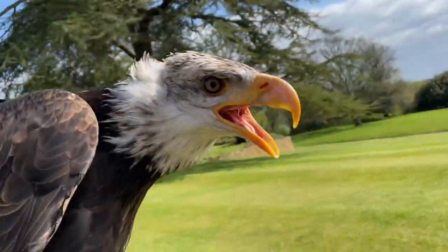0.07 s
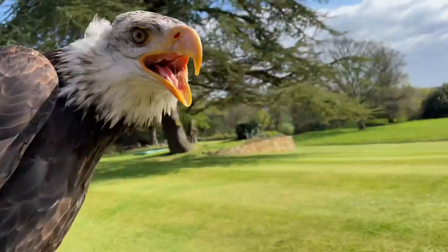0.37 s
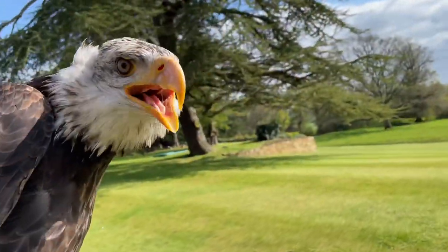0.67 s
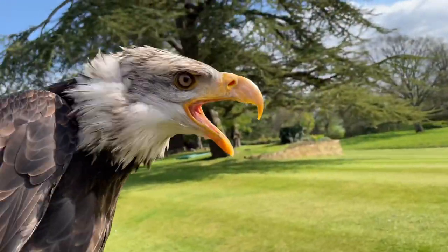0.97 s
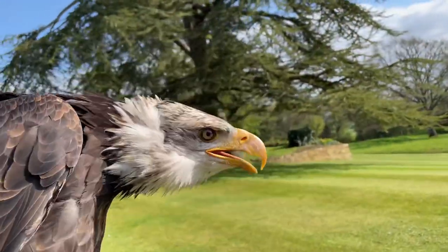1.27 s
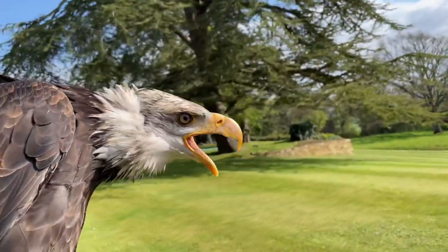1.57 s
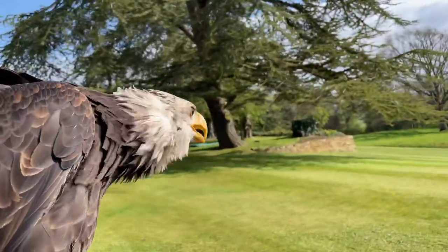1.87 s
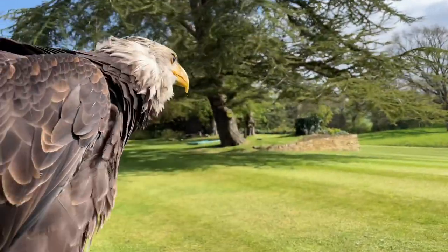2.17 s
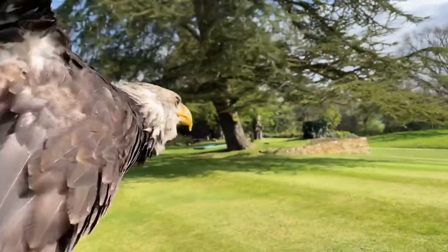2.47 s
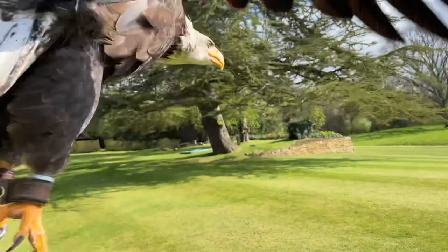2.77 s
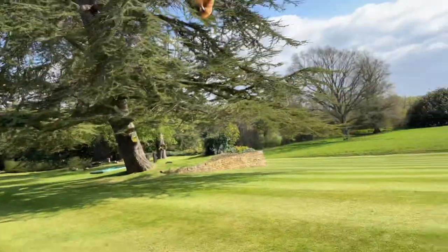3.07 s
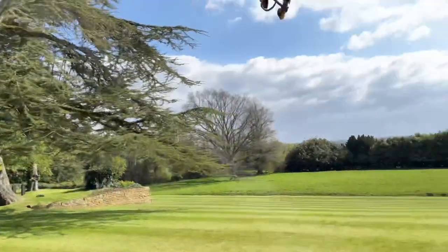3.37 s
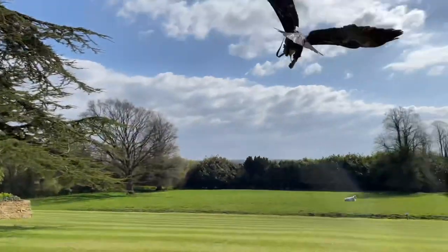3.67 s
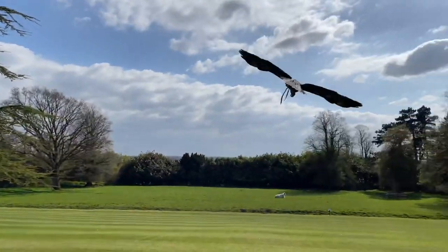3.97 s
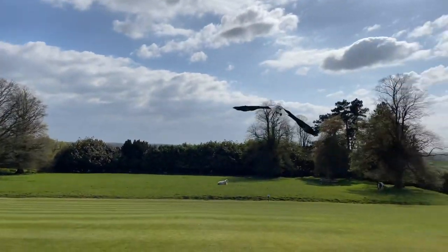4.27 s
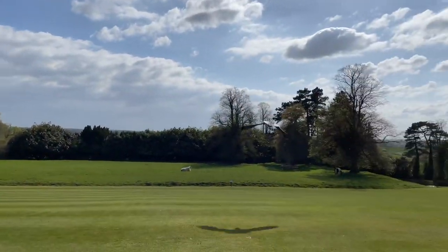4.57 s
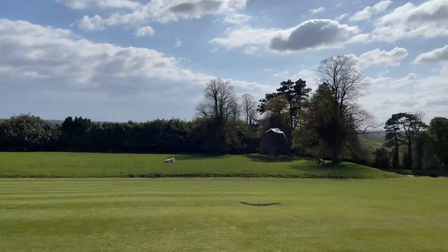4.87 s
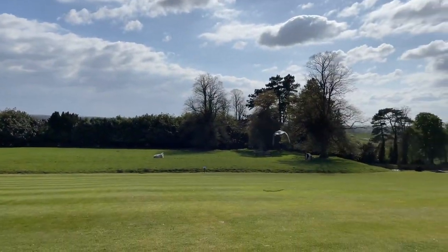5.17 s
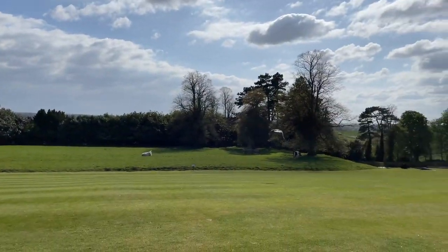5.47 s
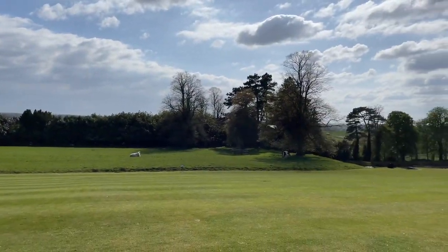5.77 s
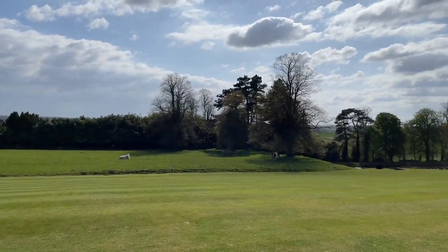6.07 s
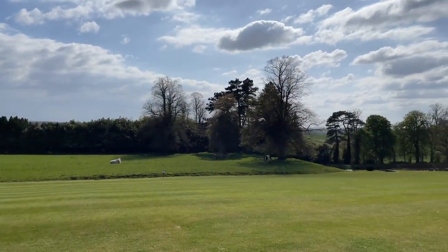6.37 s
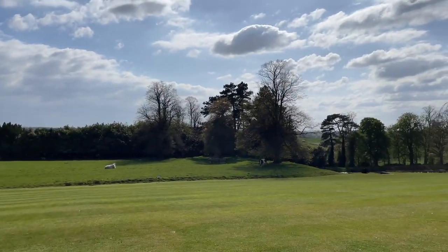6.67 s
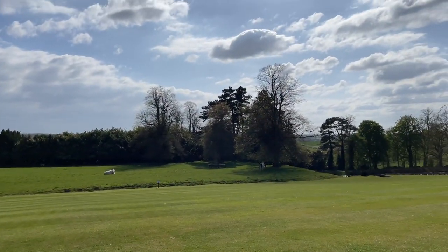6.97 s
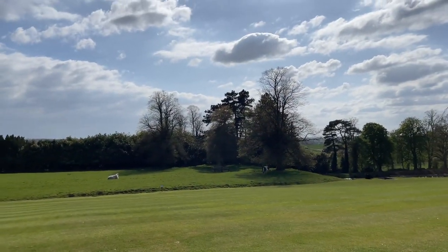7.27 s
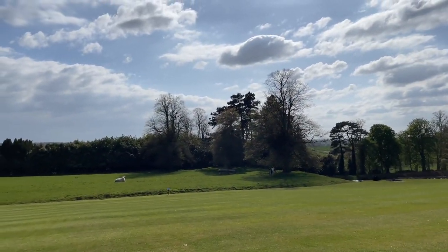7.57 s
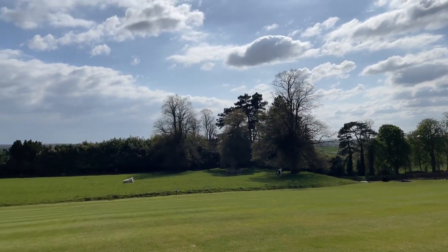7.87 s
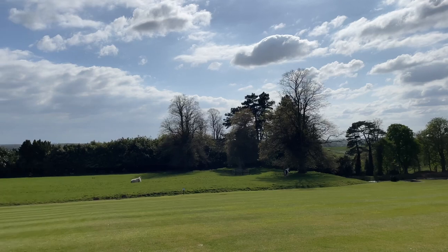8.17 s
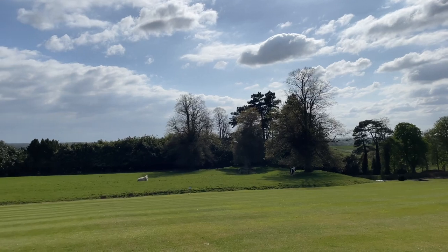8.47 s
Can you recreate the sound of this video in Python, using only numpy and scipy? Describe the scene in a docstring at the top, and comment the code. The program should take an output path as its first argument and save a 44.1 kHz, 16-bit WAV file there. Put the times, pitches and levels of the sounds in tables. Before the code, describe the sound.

Outdoors on an open lawn, a very close eagle calls three times, each reedy cry cracking into a high, raspy whistle. Feathers then rustle and snap as it launches, pushing puffs of air onto the microphone. A little bell on its leg rattles and fades with distance. Gusty wind rumble takes over, with a faint, faraway songbird toward the end.

```python
"""An eagle on a handler's glove gives three piping calls right at the microphone: each is a loud reedy note
of the syrinx that breaks into a thin whistle and drops away. Then it takes off over an open lawn: feathers
rustle, wingbeats blow on the microphone and a pellet rattles in its leg bell. As the jingle recedes, wind
buffets the microphone ports more strongly, and near the end a small bird sings far away in the trees."""
import sys
import numpy as np
from scipy import signal
from scipy.fft import rfft, irfft, next_fast_len
from scipy.io import wavfile
from scipy.ndimage import uniform_filter1d, minimum_filter1d

SR = 44100
rng = np.random.default_rng(int(sys.argv[2]) if len(sys.argv) > 2 else 0)


def transcribe(signal):
    """Save signal, clipped to [-1, 1], as a 16-bit WAV file at the path in sys.argv[1]."""
    frames = np.atleast_2d(signal).T
    limited = np.clip(frames, -1, 1)
    pcm = np.round(limited * 32767).astype(np.int16)
    wavfile.write(sys.argv[1], SR, pcm)


N = 379921
TIME = np.arange(N) / SR

# Levels are relative within a source. lead_rad is a phase and pan_db a level, both left minus right.
# distant wash of trees and roads: time_s, level_db
COUNTRY_LEVELS = [(0, -91.5), (.62, -73), (.9, -89), (2.3, -87.5), (2.8, -79), (3.7, -87), (5, -82.5),
                  (6.5, -76), (7.5, -78.5), (8.6, -73)]
# notes of the far songbird: start_s, length_s, start_hz, end_hz, level_db
SONG_NOTES = [(6.653, .15, 4440, 4084, -73.5), (6.86, 0.16, 4200, 4200, -75),
              (7.437, 0.17, 4590, 5010, -71.5), (7.59, .08, 4860, 4700, -73.5),
              (7.6, 0.065, 3620, 3300, -65), (7.705, 0.084, 3470, 3350, -73),
              (7.748, 0.13, 2916, 2925, -60.5), (8.052, 0.08, 4870, 4650, -67.5),
              (8.251, 0.088, 3050, 2946, -64.5), (8.31, 0.14, 3200, 3095, -66)]
# breeze over the microphone: time_s, rumble_db, flutter_db
BREEZE_LEVELS = [(0.1, -71.0, -74.5), (0.5, -50, -63.5), (0.72, -60.5, -71.0), (1.51, -52, -55.5),
                 (3.04, -44.5, -52.5), (3.62, -59.5, -95), (4.05, -34, -48), (4.15, -54, -72),
                 (4.3, -34.5, -53), (4.6, -40, -60), (5.28, -34.5, -40), (6.01, -32, -44.0),
                 (6.07, -40.5, -56.5), (6.6, -34.5, -44), (7.55, -39, -46.5), (8.07, -51.5, -59),
                 (8.19, -40, -54), (8.6, -39.5, -50.5)]
# single eddies from the wings or the wind: centre_s, half_length_s, level_db, top_hz
EDDY_PUFFS = [(1.538, 0.05, -32.5, 110), (1.763, 0.051, -42, 694), (2.091, 0.011, -34.5, 994),
              (2.163, 0.013, -37.5, 1073), (2.22, 0.04, -37.5, 110), (2.433, 0.017, -38, 910),
              (2.585, 0.053, -41.5, 655), (2.805, 0.041, -40, 650), (2.954, 0.085, -28, 800),
              (3.098, 0.043, -28, 850), (3.188, 0.049, -32, 960), (3.273, 0.036, -23.5, 910),
              (3.301, .014, -18.5, 1250), (3.402, 0.042, -23.5, 1220), (3.825, 0.04, -36.5, 170),
              (4.048, 0.04, -34, 290), (4.262, 0.012, -31.5, 457), (4.32, .045, -29.5, 320),
              (4.432, 0.022, -29, 350), (4.856, 0.084, -37, 413), (5.113, 0.0122, -35, 487),
              (5.188, 0.011, -33.5, 565), (5.271, 0.055, -31, 520), (5.368, 0.042, -26.5, 600),
              (5.414, 0.019, -34.5, 580), (5.579, 0.013, -36.5, 563), (5.652, 0.011, -24, 770),
              (5.682, 0.048, -21.5, 847), (6.589, 0.012, -31, 550), (6.619, 0.022, -30, 538),
              (7.551, 0.035, -36, 437), (7.9, .03, -27.5, 240)]
# snaps of quills and leather straps: start_s, level_db
QUILL_SNAPS = [(2.4524, -50.5), (2.5277, -59), (2.7906, -41.5), (2.9503, -36.5), (3.1248, -54),
               (3.2944, -53), (3.485, -42.5), (3.686, -51), (3.9588, -52.5), (4.0623, -50), (4.2323, -62.5),
               (4.5151, -52.5), (4.795, -54.5)]
# modes of the leg bell at rest: pitch_hz, level_db, t60_s, lead_rad
BELL_MODES = [(2556, -2.5, 0.04, 0.5), (2600, 1.5, 0.07, 0.99), (5584, -21.5, 0.081, 1.48),
              (6020, -19.5, 0.21, 2.15), (9480, -12, 0.23, 2.7), (15580, -16.5, .16, 2.3)]
# hardest strikes of the pellet: start_s, level_db
PELLET_STRIKES = [(2.73, -39), (2.8014, -34), (3.023, -46), (3.1286, -29), (3.179, -39.5), (3.2618, -41),
                  (3.3293, -38.5), (3.398, -28), (3.4414, -30), (3.619, -42), (3.6853, -34.5),
                  (3.7914, -40), (3.9006, -43.5), (4.0411, -47), (4.526, -42.5), (4.6176, -45.5),
                  (4.799, -44), (4.977, -48), (5.1292, -45.5), (5.1876, -51), (5.9754, -47.5),
                  (7.2266, -51), (7.9264, -46.5)]
# the pellet skates round the rim and sings a high mode: start_s, length_s, pitch_hz, level_db
RIM_TONES = [(2.765, 0.34, 5570, -50.5), (2.804, 0.21, 6050, -49.5), (7.907, 0.24, 5850, -70.5),
             (8.38, 0.12, 5830, -76)]
# whistle after each break: start_s, end_s, from_hz, top_hz, climb_s, level_db, swell_db, hiss_db, pan_db,
# then its second voice: first_hz, last_hz, first_db, last_db
CALL_WHISTLES = [(0.19, 0.378, 3132, 3807, 0.07, -36, 11, -9.5, 0.5, 4265, 4400, -1, -6),
                 (0.847, 1.106, 3505, 4147, 0.31, -33, 0.5, -16.5, -1.5, 4334, 4590, -5, -13.5),
                 (1.53, 1.827, 3017, 3855, 0.12, -34.5, -2, -21.5, -1, 4520, 4590, -9, -39)]
# loud note of each call: start_s, step_s, break_s, pitch_hz, held_db, accent_db,
# then upper_db, pan_db (both from the third harmonic up), hoarseness (0-1)
CALL_NOTES = [(-0.04, 0.058, 0.19, 1275, -19.5, 6, -1, -5.5, 0.2),
              (0.674, 0.794, 0.84, 1291, -19.5, 7.5, 0, 0, 0.5),
              (1.446, 1.46, 1.526, 1307, -23.5, 3, -5, 1.5, 0.4)]
# harmonics of the loud note, from the fundamental up: level_db, lead_rad
HARMONICS = [(-3, 0), (-0.5, 0.41), (-6, 4), (-3.5, 1.68), (-20, 1.34), (-38, 2), (-33.5, 4), (-44, 2.5),
             (-55.5, 8.5), (-53.5, 4)]

# noise spectra of the sources: frequency_hz, density_db
COUNTRY_SPECTRUM = [(100, 13), (420, 8.5), (720, 18), (1000, 11.5), (1450, 4), (2300, 7.5), (3200, 0),
                    (4800, -9), (6500, -20), (9000, -38), (15000, -49.5)]
RUMBLE_SPECTRUM = [(20, -29), (35, -11.5), (55, 2), (90, -0.5), (160, -7.5), (250, -12.5), (450, -30)]
FLUTTER_SPECTRUM = [(120, -24), (230, 2.5), (400, 0.5), (550, -3.5), (750, -18.5), (1100, -40),
                    (2200, -56.5)]
FEATHER_SPECTRUM = [(900, 14), (2000, 7.5), (4000, 5.5), (6000, 9), (7800, -3), (9000, -15), (15000, -33)]
ECHO_SPECTRUM = [(500, -1.5), (1300, -8.5), (3700, -7), (5200, -7.5), (10000, -16.5)]
TEARING_SPECTRUM = [(500, -8), (750, 0), (980, -2), (1300, -24), (2400, -50)]
SNAP_SPECTRUM = [(600, 11), (2500, -2.5), (7000, -6), (15000, -23)]
RASP_SPECTRUM = [(60, -8), (300, -3), (580, 3), (900, -11)]
WHISTLE_HISS = [(1200, -25), (2200, -9.5), (3600, 2), (4500, -3), (5600, -24.5), (7600, -15.5),
                (8800, -26.5), (10000, -50)]
NOTE_HISS = [(1500, -16.5), (2100, 3), (3300, -1), (5000, -5), (7000, -12.5), (12000, -29)]

JINGLE_START_S = 2.68
RELEASE_S, CHOKE_S = 0.037, 0.011  # dying time of a loud note and of a whistle


def undb(db):
    """Decibels to amplitude ratio."""
    return 10 ** (np.asarray(db) / 20)


def curves(table):
    """Linear interpolation of a table's columns over time."""
    times, *columns = np.transpose(table)
    return [np.interp(TIME, times, column) for column in columns]


def walk(rate_hz):
    """Smooth random modulation of unit standard deviation."""
    knots = rng.standard_normal(int(N / SR * rate_hz) + 2)
    line = np.interp(TIME * rate_hz, np.arange(len(knots)), knots)
    smooth = uniform_filter1d(line, max(1, int(SR / rate_hz / 2)))
    return smooth / smooth.std()


def bursts(per_s, decay_s):
    """Shot-noise envelope of unit rms: random impulses decay exponentially."""
    kicks = (rng.random(N) < per_s / SR) * (1 + rng.random(N)) ** 2
    decays = signal.lfilter([1], [1, -np.exp(-1 / (decay_s * SR))], kicks)
    envelope = uniform_filter1d(decays, SR // 1000)
    return envelope / np.sqrt(np.mean(envelope ** 2))


def noise(points, size=N):
    """Spectrally shaped analytic noise whose real part has unit rms."""
    hz, db = np.transpose(points)
    n = next_fast_len(size)
    f = np.arange(n // 2 + 1) * SR / n + 1
    spectrum = rfft(rng.standard_normal(n)) * undb(np.interp(np.log(f), np.log(hz), db))
    spectrum *= np.minimum(f / hz[0], 1) ** 2 * np.minimum(hz[-1] / f, 1) ** 4
    z = (irfft(spectrum, n) + 1j * irfft(-1j * spectrum, n))[:size]
    return z / z.real.std()


def ports(z, lead_rad, pan_db=0):
    """Phase and level differences place an analytic signal between two microphone ports."""
    left = (z * np.exp(.5j * lead_rad)).real * undb(pan_db / 2)
    right = (z * np.exp(-.5j * lead_rad)).real * undb(-pan_db / 2)
    return np.array([left, right])


def add(out, start_s, sound):
    """Superpose a sound at a given time."""
    i = max(0, int(start_s * SR))
    part = sound[..., :max(0, N - i)]
    out[..., i:i + part.shape[-1]] += part


def span(start_s, end_s, fade_s=0.0017):
    """Trapezoidal gate between two times."""
    return np.clip((TIME - start_s) / fade_s, 0, 1) * np.clip((end_s - TIME) / fade_s, 0, 1)


def phase_of(hz):
    """Phase is the integral of frequency."""
    return 2 * np.pi * np.cumsum(hz) / SR


def glide(length_s, start_hz, end_hz):
    """Phase and Hann envelope of a linear chirp."""
    n = int(length_s * SR)
    return phase_of(np.linspace(start_hz, end_hz, n)), np.hanning(n)


def country(gain_db=15, width=.7):
    """Distant trees and roads sum incoherently to a wide wash."""
    wash = noise(COUNTRY_SPECTRUM).real + width * ports(noise(COUNTRY_SPECTRUM), np.pi)
    return wash * undb(curves(COUNTRY_LEVELS)[0] + gain_db + 1.2 * walk(11))


def tree_echoes(source, t60_s=1.1, build_s=0.021):
    """Scattering from trunks and branches gives an exponentially decaying reverberation."""
    t = TIME[:SR]
    echoes = np.array([noise(ECHO_SPECTRUM, SR).real for _ in range(2)])
    echoes *= undb(-60 * t / t60_s) * (1 - np.exp(-t / build_s))
    echoes /= np.sqrt(np.sum(echoes[0] ** 2))
    return signal.fftconvolve(source[None], echoes, axes=1)[:, :N]


def songbird(warble_rad=0.92):
    """Phase modulation makes a far bird's pure notes warble."""
    out, warble = np.zeros(N), warble_rad * walk(150)
    for start_s, length_s, start_hz, end_hz, db in SONG_NOTES:
        phase, swell = glide(length_s, start_hz, end_hz)
        add(out, start_s, undb(db) * swell * np.sin(phase + warble[int(start_s * SR):][:len(phase)]))
    return out


def wind(gain_db=-1, gust_db=2.5, strong_db=-42):
    """Turbulent pressure on the ports: a rumble, and a flutter that tears higher in strong flow."""
    rumble_db, flutter_db = curves(BREEZE_LEVELS)
    gusts = undb(gain_db + gust_db * walk(25))
    chop = .2 + .85 * bursts(55, .008)
    rumble = noise(RUMBLE_SPECTRUM).real + undb(-6) * ports(noise(RUMBLE_SPECTRUM), np.pi)
    flutter = noise(FLUTTER_SPECTRUM).real + undb(-1) * ports(noise(FLUTTER_SPECTRUM), np.pi)
    tearing = ports(noise(TEARING_SPECTRUM), 1.6) * undb(-11 + .45 * (flutter_db - strong_db))
    return gusts * (rumble * undb(rumble_db) + (flutter + tearing) * chop * undb(flutter_db))


def draught_and_eddies(start_s=2.89, end_s=3.46, draught_db=-32):
    """The wings' downdraught rumbles on the ports; each passing eddy is a pressure pulse."""
    crackle = undb(3.03 * walk(400))
    out = ports(noise(RUMBLE_SPECTRUM), 0.9) * undb(draught_db) * span(start_s, end_s, 0.035)
    for centre_s, half_length_s, db, top_hz in EDDY_PUFFS:
        n = int(2 * half_length_s * SR)
        spectrum = [(min(60, top_hz / 7), 2), (top_hz / 6, 2), (top_hz / 2, -3), (top_hz, -5),
                    (top_hz * 2, -23), (top_hz * 4, -52)]
        puff = noise(spectrum, n) * crackle[int(centre_s * SR):][:n]
        lead_rad = 2.36 if centre_s < end_s else 1  # eddies up to the end of the downdraught strike the ports from the side, later ones from the front
        add(out, centre_s - half_length_s, ports(puff, lead_rad) * np.hanning(n) ** 2 * undb(db))
    return out


def feathers(open_s=2.633, hold_s=0.34, rise_db_per_s=88.5, fall_db_per_s=21, snap_s=0.0036):
    """Friction of vanes rustles as the wings open and fades as the bird leaves; quills and straps snap."""
    age = TIME - open_s
    rustle_db = -55.5 + rise_db_per_s * np.minimum(age, 0) - fall_db_per_s * np.maximum(age - hold_s, 0)
    flap_db, grain_db = 4 * walk(20), 3 * walk(360)
    out = ports(noise(FEATHER_SPECTRUM), 2.06) * undb(rustle_db + flap_db + grain_db)
    decay = np.exp(-TIME[:SR // 20] / snap_s)
    for start_s, db in QUILL_SNAPS:
        add(out, start_s, ports(noise(SNAP_SPECTRUM, len(decay)), 1.75) * decay * undb(db))
    return out


def light_taps(distance_m, count=32, taps_per_s=11, calm_s=2.8):
    """Impacts (start_s, level_db) in the swinging bell: sparser in the glide, fainter with distance."""
    taps, start_s = [], JINGLE_START_S
    for lateness, spread_db in rng.standard_normal((count, 2)):
        loss_db = 3 * np.log1p(np.interp(start_s, TIME, distance_m))
        taps.append((start_s, -44.5 + spread_db - loss_db))
        start_s += (1 + (start_s - JINGLE_START_S) / calm_s) * np.exp(.3 * lateness) / taps_per_s
    return taps


def mode_envelope(hz, t60_s, strikes, rolling, skitter_s=0.013, contact_s=0.00068):
    """A damped mode integrates the pellet's rolling and knocks; finite contact time softens them."""
    t = TIME[:SR // 3]
    pole = [1, -np.exp(-np.log(1000) / t60_s / SR)]
    ring = signal.lfilter([1], pole, (rng.standard_normal(N) + 1j * rng.standard_normal(N)) * rolling)
    ring *= undb(-39) / abs(ring).max()
    for start_s, db in strikes:
        real, imag, spot = rng.standard_normal((3, len(t)))
        touches = (real + 1j * imag) * np.exp(-t / skitter_s)
        touches[0] += 10 * np.exp(1j * np.pi * spot[0])  # the first touch is the hardest
        knock = signal.lfilter([1], pole, touches)
        spot_db = 4 * spot[1] * (hz > 2 * BELL_MODES[0][0])  # high modes depend on the spot struck
        add(ring, start_s, knock / abs(knock).max() * undb(db + spot_db))
    contact = np.hanning(2 * int(contact_s * SR) + 3)
    return signal.fftconvolve(ring, contact / contact.sum(), "same")


def leg_bell(top_m_per_s=11, launch_s=2.8, gather_s=1.3):
    """A pellet excites a receding bell: Doppler shift lowers its modes and air absorption dulls them."""
    speed = top_m_per_s * (1 - np.exp(-np.maximum(TIME - launch_s, 0) / gather_s))
    distance_m = np.cumsum(speed) / SR
    rolling = bursts(30, .012) * np.clip((TIME - JINGLE_START_S) / .2, 0, 1) * 2.5 / (2.5 + distance_m)
    strikes = PELLET_STRIKES + light_taps(distance_m)
    out = np.zeros((2, N))
    for hz, mode_db, t60_s, lead_rad in BELL_MODES:
        ring = mode_envelope(hz, t60_s, strikes, rolling)
        carrier = np.exp(1j * phase_of(hz / (1 + speed / 343)))
        absorption_db = 2 * hz / 10000 * np.sqrt(distance_m)
        out += ports(ring * carrier * undb(mode_db - absorption_db), lead_rad)
    for start_s, length_s, hz, db in RIM_TONES:
        phase, swell = glide(length_s, hz, hz)
        add(out, start_s, ports(np.exp(1j * phase) * swell * undb(db), 1.76))
    return out


def two_voices(hz, second_hz, second_db):
    """Nonlinear coupling in the syrinx: returns one tone, and the second voice with their products."""
    tone, second = np.exp(1j * phase_of(hz)), np.exp(1j * phase_of(second_hz))
    combinations = undb(-8) * tone ** 2 / second + undb(-15) * second ** 2 / tone
    octave = undb(-22)
    return tone, octave * tone ** 2 + undb(second_db) * (second + combinations + octave * second ** 2)


def whistles(gain_db=1, drop_hz=1350, drop_s=0.037, squeak_s=0.024, clearing_db=11.5, pull=.3):
    """Biphonation: both sides of the syrinx sound in a thin whistle while air hisses past."""
    out = np.zeros((2, N))
    waver, second_waver, flicker, drift = walk(350), walk(500), walk(130), walk(30)
    scrape, hiss = noise(RASP_SPECTRUM).real, noise(WHISTLE_HISS)
    phase, swell = glide(length_s=0.023, start_hz=1290, end_hz=925)  # the low note that ends each call
    ending = undb(-42.5) * swell * (np.sin(phase) + undb(-5.5) * np.sin(2 * phase))
    for row in CALL_WHISTLES:
        start_s, end_s, from_hz, top_hz, climb_s, level_db, swell_db, hiss_db, pan_db = row[:9]
        first_hz, last_hz, first_db, last_db = row[9:]
        gate = span(start_s, end_s)
        on = gate > 0
        age, remaining = TIME[on] - start_s, end_s - TIME[on]
        n = len(age)
        progress = np.linspace(0, 1, n)
        # it climbs, squeaks as it drops, and chokes
        hz = from_hz + (top_hz - from_hz) * np.sin(np.pi / 2 * np.minimum(age / climb_s, 1))
        hz = hz * (1 + .011 * drift[on]) - drop_hz * np.maximum(1 - remaining / drop_s, 0) ** 2
        squeak_db = 5.5 * np.exp(-(2 * (remaining - squeak_s) / squeak_s) ** 2)
        choke_db = 27.5 * np.maximum(1 - remaining / CHOKE_S, 0)
        db = level_db + gain_db + swell_db * (progress - .5) + squeak_db - choke_db
        # the first voice pulls the second along and drags it down in the drop
        second_hz = np.minimum(np.linspace(first_hz, last_hz, n) + pull * (hz - np.median(hz)), 1.8 * hz)
        second_hz *= 1 + .005 * second_waver[on]
        tone, rest = two_voices(hz * (1 + .004 * waver[on]), second_hz, np.linspace(first_db, last_db, n))
        voice = tone * undb(1.5 * flicker[on]) + rest
        # the more air escapes, the raspier both voices are
        rasp = 1 + undb(hiss_db + 4 - clearing_db * progress) * scrape[on]
        voice *= rasp / np.sqrt(np.mean(rasp ** 2))
        breath = undb(hiss_db - clearing_db * (progress - .5)) * hiss[on]
        # the low voice lingers underneath and rises
        low_hz = (1480 + 750 * progress ** 2) * (1 + .025 * waver[on])
        low_voice = undb(-65.5) * np.sin(phase_of(low_hz))
        out[:, on] += (ports(voice + breath, 1.76, pan_db) * undb(db) + low_voice) * gate[on]
        add(out, end_s - CHOKE_S / 2, ending)
    return out


def note_pitch(t, start_s, step_s, break_s, pitch_hz, scoop_s=0.021, slide_s=0.016, creep_hz_per_s=320):
    """Frequency contour: the note scoops up, steps, creeps higher and flicks up at the break."""
    scoop_hz = 226 * np.exp(-((t - start_s) / scoop_s) ** 2)
    step_hz = 42.1 * (1 + np.tanh((t - step_s) / slide_s)) / 2
    flick_hz = 22 * (1 + np.tanh((t - break_s) / slide_s)) / 2
    return pitch_hz - scoop_hz + step_hz + creep_hz_per_s * np.maximum(t - step_s, 0) + flick_hz


def note_level(t, start_s, break_s, held_db, accent_db, attack_s=0.021, accent_s=0.09):
    """Envelope in dB: a fast attack, an accent relaxing to the held level, a release at the break."""
    age = t - start_s
    attack_db = 29 * np.maximum(1 - age / attack_s, 0)
    accent = np.exp(-np.maximum(age - attack_s, 0) / accent_s)
    release_db = 29.5 * np.sin(np.pi / 2 * np.clip((t - break_s) / RELEASE_S, 0, 1))
    return held_db - attack_db + accent_db * accent - release_db


def loud_notes(gain_db=1, jitter=0.0017, wobble=0.003, settle_s=0.029, brightening=0.3, full_db=-19):
    """Self-sustained oscillation: the syrinx starts hoarse, locks into a tone and brightens with effort."""
    out = np.zeros((2, N))
    waver, rasp, sway, hiss = walk(170), walk(800), walk(40), noise(NOTE_HISS)
    for start_s, step_s, break_s, pitch_hz, held_db, accent_db, upper_db, pan_db, hoarseness in CALL_NOTES:
        gate = span(max(start_s, 0), break_s + RELEASE_S)
        on = gate > 0
        t = TIME[on]
        hz = note_pitch(t, start_s, step_s, break_s, pitch_hz)
        db = note_level(t, start_s, break_s, held_db, accent_db)
        roughness = hoarseness * np.exp(-((t - start_s) / settle_s) ** 2) * rasp[on]
        phase = phase_of(hz * (1 + jitter * waver[on] + wobble * sway[on] + roughness / 20))
        effort_db = brightening * np.minimum(db - full_db, 0)
        voice = undb(-43) * ports(hiss[on], 1.5)
        for k, (harmonic_db, lead_rad) in enumerate(HARMONICS):
            beamed = k > 1  # the open beak beams only the upper harmonics
            amplitude = undb(harmonic_db + effort_db * min(k, 3) + upper_db * beamed)
            harmonic = amplitude * np.exp(1j * (k + 1) * phase)
            voice += ports(harmonic, lead_rad, pan_db if beamed else 2 * (k - 1))
        out[:, on] += voice * (1 + roughness) * undb(db + gain_db) * gate[on]
    return out


def centre_bass(stereo, start_s=3.83, end_s=4.58, below_hz=860):
    """Cancelling the low side signal narrows the bass to the middle; the treble stays wide."""
    side = (stereo[0] - stereo[1]) / 2
    treble = signal.sosfiltfilt(signal.butter(4, below_hz, "high", fs=SR, output="sos"), side)
    amount = np.sqrt(np.clip((TIME - start_s) / (end_s - start_s), 0, 1))
    return stereo - np.array([[1], [-1]]) * (side - treble) * amount


def scene():
    """Superposition of eagle, bell and wind close by, with the country behind."""
    eagle, song = loud_notes() + whistles(), songbird()
    near = eagle + leg_bell() + feathers() + wind() + draught_and_eddies()
    far = country() + song + tree_echoes(undb(-46) * eagle[1] + undb(-3) * song)
    return centre_bass(near + far)


def record(dry, ceiling=.92, hold_s=0.0013, top_hz=15800):
    """Peak limiting holds the loudest call under full scale; a low-pass filter cuts the top."""
    hold = int(hold_s * SR)
    allowed_gain = np.minimum(ceiling / (abs(dry).max(axis=0) + 1e-9), 1)
    gain = uniform_filter1d(minimum_filter1d(allowed_gain, 2 * hold), hold)
    return signal.sosfilt(signal.ellip(8, .2, 70, top_hz, fs=SR, output="sos"), dry * gain)


dry = scene()
out = record(dry)
transcribe(out)
```